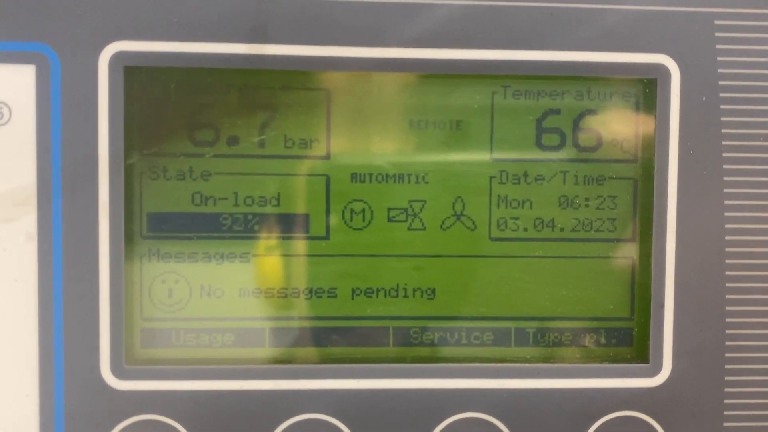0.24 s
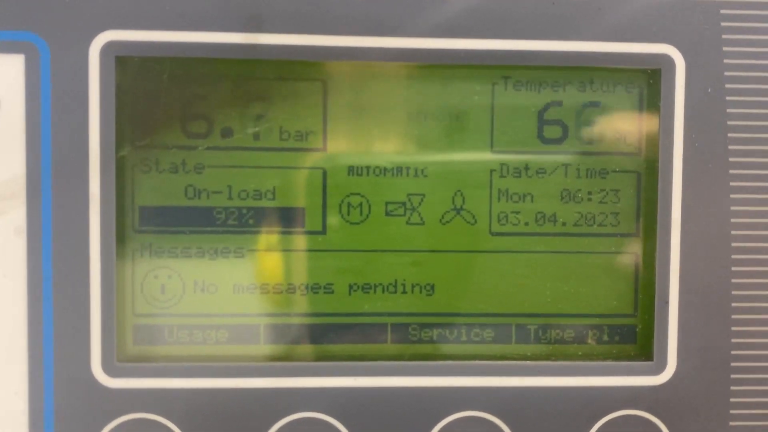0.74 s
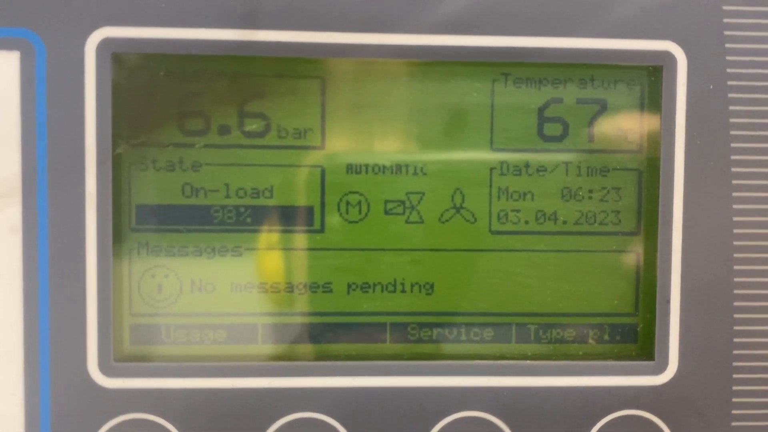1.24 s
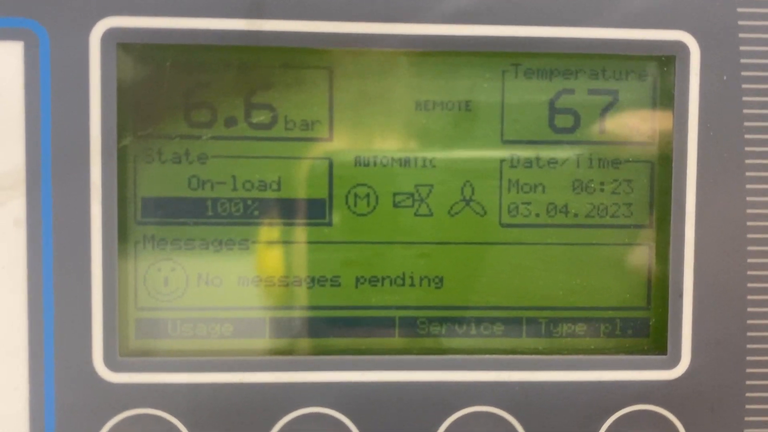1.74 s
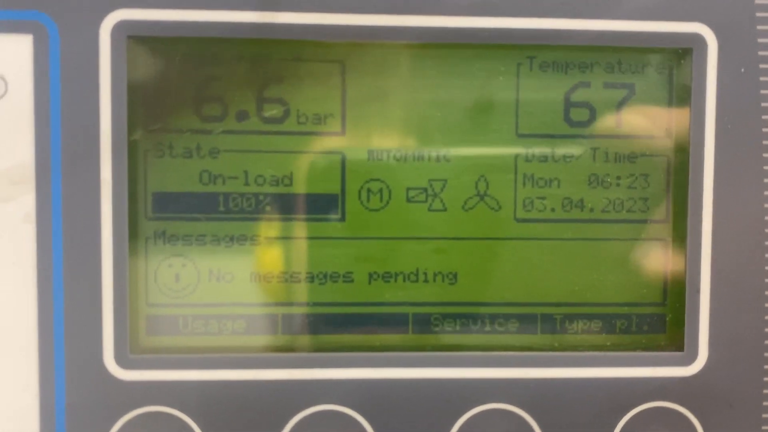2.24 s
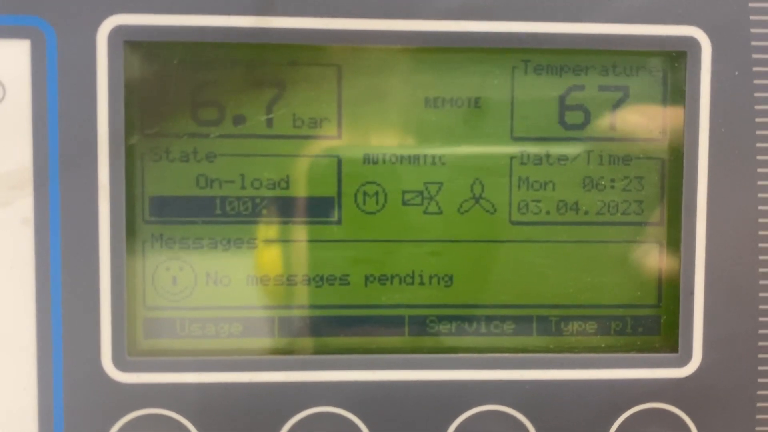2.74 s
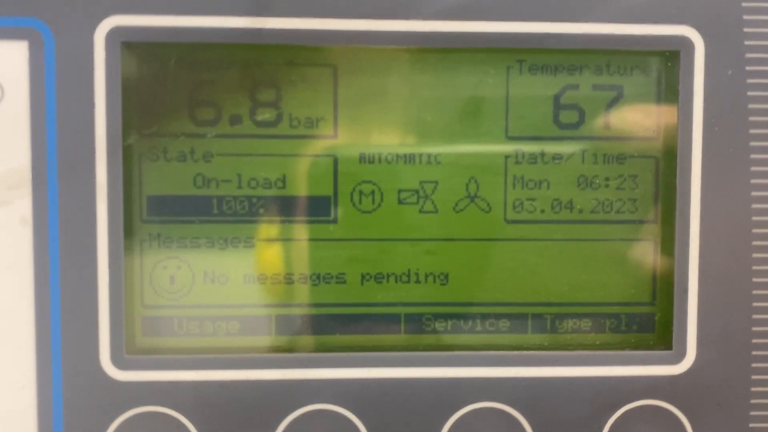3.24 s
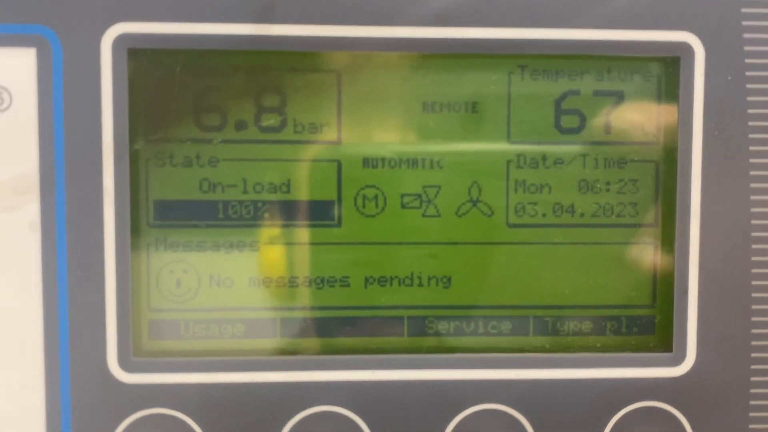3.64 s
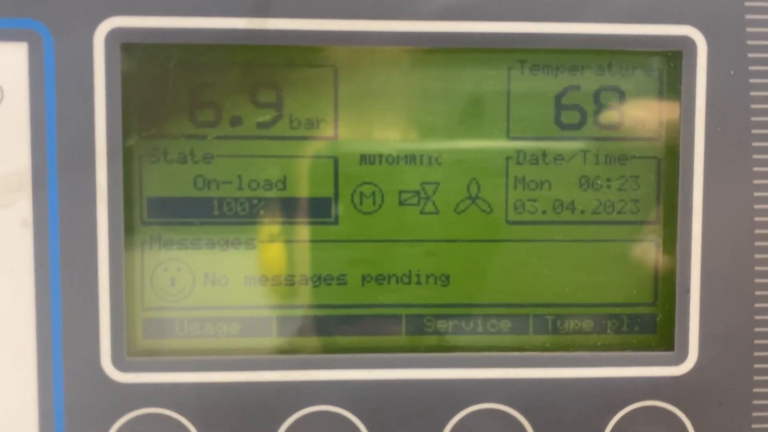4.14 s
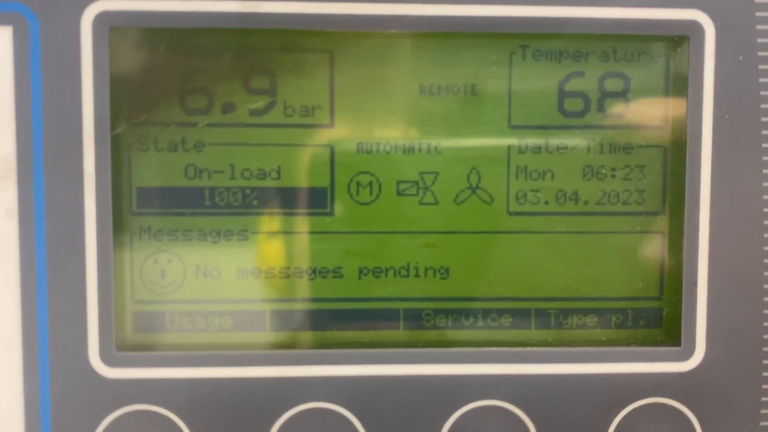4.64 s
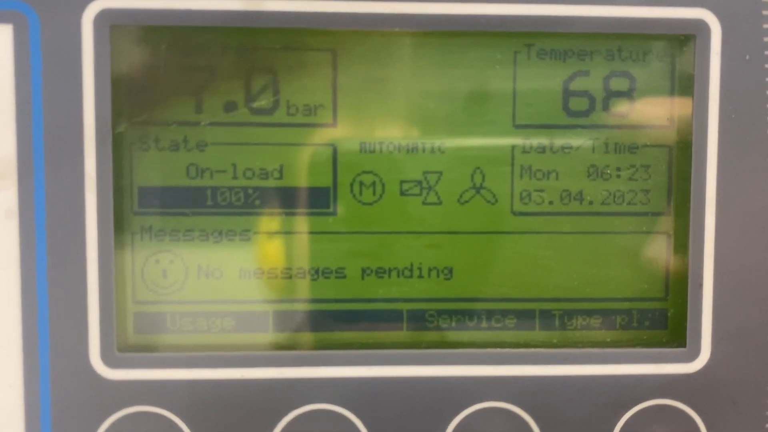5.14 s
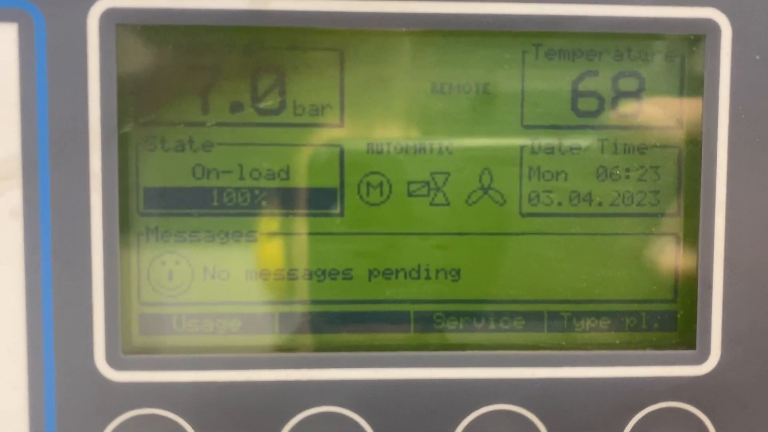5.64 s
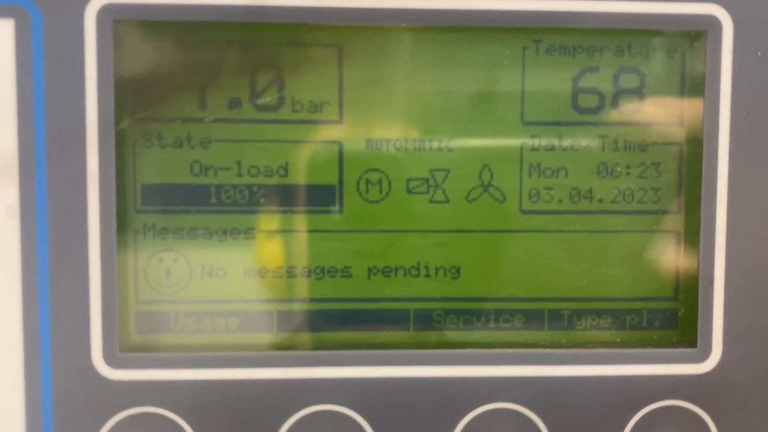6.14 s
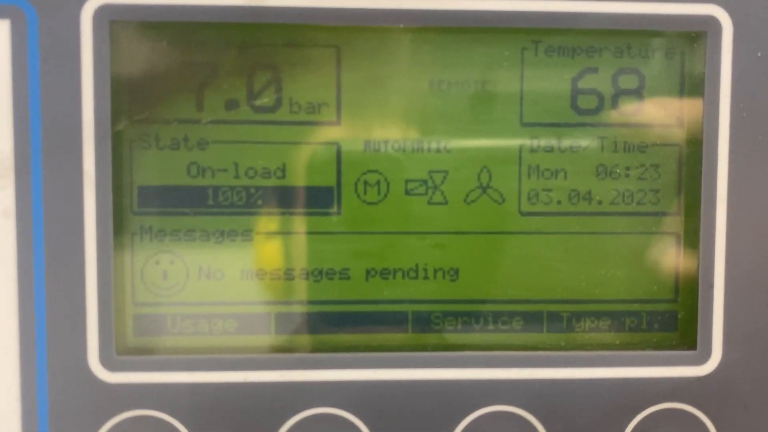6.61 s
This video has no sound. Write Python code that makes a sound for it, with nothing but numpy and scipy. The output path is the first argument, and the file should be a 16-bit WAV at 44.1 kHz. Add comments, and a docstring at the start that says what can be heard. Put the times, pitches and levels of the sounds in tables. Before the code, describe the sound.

A screw air compressor drones loudly up close, its whine climbing for two seconds then stepping down and settling under steady rushing air and deep hum.

```python
"""A variable-speed screw air compressor runs on load in a workshop, heard close to its cabinet.
At first the rotors speed up: their tones, made of sines, swell and fade in the standing waves of the room.
They then step down and settle, while a deep hum from a second drive, also sines, slows and picks up again.
Near the end a faint squeak, one gliding sine, rises. All along, fan blades and motors add steady sine tones,
and air rushes as shaped noise that rings in panels and ducts."""
import sys
import numpy as np
from scipy import signal
from scipy.fft import rfft, irfft, next_fast_len
from scipy.io import wavfile
from scipy.ndimage import uniform_filter1d

SR = 44100
rng = np.random.default_rng(int(sys.argv[2]) if len(sys.argv) > 2 else 0)


def log_audio(samples):
    """Write samples as a 16-bit WAV file to the path given in sys.argv[1]."""
    # one column per channel
    frames = np.atleast_2d(samples).T
    # limit to full scale, then quantise
    limited = np.clip(frames, -1, 1)
    pcm = np.round(limited * 32767).astype(np.int16)
    wavfile.write(sys.argv[1], SR, pcm)


N = 303143   # length in samples

# Air rush on the right: (frequency [Hz], level [dB per Hz])
AIR_RUSH = [(25, -79), (60, -51.5), (100, -49.5), (200, -51.5), (340, -56.5), (520, -60.5), (850, -65.5),
            (1400, -63.5), (2300, -73), (3500, -69), (5500, -65), (7700, -62), (8900, -76), (9450, -93)]
# Panels and ducts that ring in the rush: (centre [Hz], width [Hz], left level [dB per Hz], right level [dB per Hz])
PANEL_RESONANCES = [(305.4, 31, -51, -52), (1314, 180, -59, -57.5), (2157, 62, -70, -69.5),
                    (2636, 65, -60, -60), (2777, 89, -65, -58), (2904, 66, -57.5, -62.5),
                    (3096, 164, -57.5, -56.5), (3910, 108, -59.5, -61), (4780, 390, -66, -71),
                    (5056, 160, -55.5, -78.5), (5220, 110, -51.5, -59), (5830, 180, -61.5, -96),
                    (6276, 140, -54, -66), (6790, 445, -57.5, -58), (7270, 290, -62, -58.5)]
# Left compared with right: (frequency [Hz], left minus right [dB], likeness [0-1], left lead besides travel [rad])
LEFT_RIGHT = [(55, -9, .95, -1.3), (85, -12, .86, -2.3), (110, -14, .5, -4), (135, -11, .87, -4.9),
              (220, -4.5, .88, -5.8), (260, -2.5, .8, -6.2), (420, -6, .56, -5.6), (700, -1, .77, -6),
              (1050, -2.5, .6, -6.8), (1400, -4, .77, -7.1), (2300, -1.3, .45, -6), (4500, 2, .35, -6.5),
              (5500, 6, .4, -6.1), (6800, 0, .65, -5.4), (9000, -2, .4, -4.6)]
# The hiss eases as pressure builds: (time [s], change of level [dB])
TREBLE_EASING = [(0, 0.2), (1, -1), (3, -1.5), (5, -1.43), (6.87, -1.75)]
# Fan blade tone: (time [s], right level [dB])
BLADE_LEVEL = [(0, -31), (.8, -31.5), (1.2, -31.5), (1.7, -26.5), (2.6, -39), (3.5, -28.5), (4.7, -39),
               (5.9, -28.5), (6.5, -34.5), (6.87, -35)]
# Faint rising squeak: (time [s], frequency [Hz], level on both sides [dB])
SQUEAK_GLIDE = [(6.26, 1290, -57), (6.29, 1325, -41), (6.34, 1405, -38), (6.385, 1470, -40.5),
                (6.41, 1500, -53), (6.5, 1510, -59)]
# Deep hum of the second drive: (time [s], frequency [Hz], right level [dB])
DRIVE_HUM = [(0, 53.0, -25.3), (1.2, 53.1, -25), (2.0, 54.2, -23), (3.1, 55.6, -21), (3.35, 55.1, -22.4),
             (3.55, 52.6, -28.5), (4.15, 45, -36), (4.45, 41.8, -43), (5.68, 41.7, -45), (5.85, 45, -31),
             (6.08, 50.5, -26), (6.3, 51.6, -26), (6.87, 51.4, -27)]
# Tone at twice the hum frequency: (time [s], right level [dB])
DRIVE_HUM_OCTAVE = [(0, -42), (1.0, -39), (1.4, -48), (3.2, -35.5), (3.8, -31.5), (4.2, -25), (4.45, -36.5),
                    (5.8, -34.5), (6.4, -32.5), (6.87, -41)]
# Other overtones of the hum: (multiple of the hum frequency, level relative to the hum [dB])
DRIVE_HUM_OVERTONES = [(1.5, -21), (3, -13), (6, -16)]
# How often lobes pass, a ramp up and then steps down: (time [s], lobe rate [Hz])
LOBE_RATE = [(0, 290.0), (.28, 290.1), (2.28, 319.3), (2.88, 319.3), (2.98, 317.6), (3.56, 317.6),
             (3.66, 316.3), (4.77, 316.3), (4.8, 314.7), (6.87, 314.7)]
# Standing waves of the room at 1, 2, 3 and 4 times the lobe rate, four tables alike:
# (lobe rate [Hz], left level [dB], right level [dB], left lead [rad])
ROOM_FIRST = [(290.1, -16.7, -15.2, .4), (292, -14.2, -13, .4), (294, -14.5, -12.5, .3),
              (296.4, -15.7, -12, .3), (299.7, -30, -17.5, .4), (301.3, -26, -14.3, 1.6),
              (302.7, -22, -16.5, 1.7), (305, -22, -27, 1.2), (306.5, -17.3, -17.6, .6),
              (308, -19, -19, .6), (311, -32, -28.5, 1.0), (313.7, -28, -19.5, .6),
              (314.7, -24.1, -24.9, .5), (315.4, -22, -18, .6), (316.3, -30.5, -28.5, -.9),
              (317.6, -34.5, -27.4, -.5), (318.4, -42, -25.4, .1), (319.3, -35, -22.1, 1.2)]
ROOM_SECOND = [(290.1, -32.5, -33.0, 2.5), (292.0, -33.1, -33.8, 2.4), (294.0, -45.9, -44.6, 2.5),
               (299.0, -42.2, -42.8, 2.2), (302.5, -33.5, -33.5, 2.5), (305.5, -39.2, -40.5, 2.9),
               (308.5, -38.3, -42.9, 3.2), (310.5, -44.3, -33.5, 4.3), (313.0, -42.6, -44.3, 5.3),
               (314.7, -35.9, -35.5, 8.2), (315.5, -40.9, -41.0, 8.1), (316.3, -40.1, -40.7, 9.3),
               (317.0, -40.5, -38.1, 10.3), (317.6, -37.8, -39.4, 11.9), (318.4, -40.7, -37.5, 12.1),
               (319.3, -38.9, -33.6, 13.8)]
ROOM_THIRD = [(290.1, -48.7, -48.1, 2.2), (297.0, -52.2, -52.5, 2.2), (300.0, -43.5, -45.8, 2.1),
              (305.0, -53.7, -50.8, 2.3), (311.0, -46.9, -44.2, 2.7), (313.0, -51.5, -42.8, 2.9),
              (314.7, -48.7, -46.9, 2.6), (316.3, -47.6, -44.9, 1.2), (317.6, -43.0, -42.9, 2.1),
              (319.3, -48.2, -47.5, 2.6)]
ROOM_FOURTH = [(290.1, -47.6, -45.6, 1.7), (292.6, -46, -44, 2.5), (294, -33.5, -32.3, 2.5),
               (296.8, -26, -23, 2.3), (298.7, -34, -33, 2.4), (300.6, -32.6, -29.6, 2.6),
               (301.6, -38, -37, 2.2), (304, -28.6, -26, 2.3), (307.3, -29.8, -27.6, 2.7),
               (308.4, -37, -33, 2.6), (310, -37, -24, 4.0), (311.4, -31.6, -29.2, 3.3),
               (313.2, -40, -38, 3.2), (314.7, -38.3, -35.5, 2.4), (315.5, -48, -40, 1.8),
               (316.3, -42, -29.3, 3.9), (317.6, -43, -33.5, 2.1), (318.4, -52, -37, .1),
               (319.3, -41, -35, -.7)]
# Every other lobe is stronger, so tones at 1/2 and 3/2 of the lobe rate throb together, two tables alike:
# (time [s], right level at the crest [dB], throb depth [0-1])
HALF_ORDER = [(0, -38, 0.1), (1.25, -26, 0), (1.55, -30, .3), (2.3, -26.5, 1), (3.3, -27, .9),
              (4.2, -27, 1), (6.87, -25.5, 1)]
THREE_HALVES_ORDER = [(0, -54, .3), (1.1, -48.5, 0.39), (1.5, -37.5, 0.55), (2.7, -44, 0.5),
                      (3.3, -38.5, 0.99), (6.87, -35.5, .8)]
# Tone at 5/4 of the lobe rate: (lobe rate [Hz], right level [dB])
FIVE_QUARTERS_ORDER = [(290, -46), (296, -33), (301, -30), (307, -35), (313, -37), (315, -41), (317, -50)]

TRAVEL_S = .00043   # sound reaches the left side this much earlier
CABINET_T60_S, CABINET_DB = .3, -10   # echoes between cabinet and walls: time to fall 60 dB, level beside direct
BLADES_HZ, BLADES_OCTAVE_DB = 187.5, -11   # the octave is relative to the blade tone
MAINS_HZ, MAINS_DB = 100, -41   # magnetic buzz of the motors
FIFTH_DB = -48   # tone at 5 times the lobe rate, right level
THROB_S, THROB_CREST_S = .865, 6.75   # period and time of the last crest
ROOM_SETTLES_S = .06   # a change of pitch is smoothed over this long in the standing waves
CUTOFF_HZ = 9480


def from_db(db):
    """Turn decibels into a gain."""
    return 10 ** (np.asarray(db) / 20)


def in_time(rows):
    """Read a table's columns along time, one value per sample."""
    s, *columns = np.transpose(rows)
    return [np.interp(np.arange(N) / SR, s, column) for column in columns]


def at_hz(rows, hz):
    """Read a table's columns at given frequencies, on a logarithmic scale as pitch is heard."""
    points, *columns = np.transpose(rows)
    return [np.interp(np.log(hz), np.log(points), column) for column in columns]


def drift(rate):
    """Wander at random with a spread of about 1, through 2 * rate random values a second."""
    steps = rng.standard_normal(400)
    position = np.arange(N) / SR * 2 * rate % 399
    return 1.22 * np.interp(position, np.arange(400), steps)   # joining by lines shrinks the spread; undo that


def tone(hz, left_db, right_db, lead, waver_db):
    """Make a sine on both sides whose level wavers a little; lead [rad] puts the left ahead."""
    turn = 2 * np.pi * (np.cumsum(hz) / SR + rng.random())
    waver = waver_db * (drift(7) + 0.92 * drift(18))
    height = np.sqrt(2) * from_db(waver)   # levels in dB are RMS, so the peak is higher
    left = from_db(left_db) * np.sin(turn + lead)
    right = from_db(right_db) * np.sin(turn)
    return height * np.array([left, right])


def port_tone(hz, right_db, waver_db):
    """Make a sine that takes its left-right balance and lead from the frequency."""
    balance_db, _, lead = at_hz(LEFT_RIGHT, hz)
    travel_lead = 2 * np.pi * hz * TRAVEL_S
    return tone(hz, right_db + balance_db, right_db, lead + travel_lead, waver_db)


def echoes(size):
    """Spectrum of direct sound plus a dying random tail, unlike on each side: it ripples finely."""
    t = np.arange(SR // 2) / SR
    tail = rng.standard_normal((2, len(t))) * from_db(-60 * t / CABINET_T60_S)
    tail *= from_db(CABINET_DB) / np.sqrt(np.sum(tail ** 2, axis=1, keepdims=True))
    return (1 + rfft(tail, size)) / np.sqrt(1 + from_db(2 * CABINET_DB))   # keep the total power


def air(gust_db, panel_db):
    """Partly shared noise on the two sides, coloured by rush, panel resonances and echoes."""
    size = next_fast_len(N)
    hz = np.maximum(np.arange(size // 2 + 1) * SR / size, 1)
    balance_db, alike, lead = at_hz(LEFT_RIGHT, hz)
    alike = np.clip(alike, 0, 1)
    rush_db, = at_hz(AIR_RUSH, hz)

    # Doubling the dB before from_db gives power instead of gain
    power = from_db(2 * np.array([rush_db + balance_db, rush_db]))
    for centre, width, left_db, right_db in PANEL_RESONANCES:
        peak = from_db([[2 * left_db], [2 * right_db]])
        power += peak / (1 + (2 * (hz - centre) / width) ** 2) ** 2

    right, own = rfft(rng.standard_normal((2, size)))
    left = alike * right + np.sqrt(1 - alike ** 2) * own
    left = left * np.exp(1j * (lead + 2 * np.pi * hz * TRAVEL_S))
    rush = np.sqrt(power * SR / 2) * echoes(size) * [left, right]

    # Each frequency range flickers on its own, the thin panels most
    edges_hz = [0, 400, 1000, 2000, 2500, 2700, 2830, 2980, 3300, 4200, 5000, 5600, 6500, 7600, SR]
    easing_db, = in_time(TREBLE_EASING)
    out = 0
    for low, high in zip(edges_hz, edges_hz[1:]):
        flicker_db = panel_db if 2000 <= low < 3300 else gust_db
        level_db = flicker_db * drift(7)
        if low >= 2500:
            level_db = level_db + easing_db
        in_range = (hz >= low) & (hz < high)
        out = out + from_db(level_db) * irfft(rush * in_range, size)[:, :N]
    return out


def fan():
    """Passing blades push the air at a steady rate: a tone and its octave."""
    hz = np.full(N, BLADES_HZ)
    level_db, = in_time(BLADE_LEVEL)
    blade_tone = port_tone(hz, level_db, waver_db=1.5)
    octave = port_tone(2 * hz, level_db + BLADES_OCTAVE_DB, waver_db=1.4)
    return blade_tone + octave


def squeak():
    """One short sine glides upward, silent outside its rows."""
    hz, level_db = in_time(SQUEAK_GLIDE)
    t = np.arange(N) / SR
    sounding = (t > SQUEAK_GLIDE[0][0]) & (t < SQUEAK_GLIDE[-1][0])
    return sounding * tone(hz, level_db, level_db, 0, waver_db=.6)


def hum():
    """The second drive hums with overtones that follow its speed; the mains buzz keeps its pitch."""
    hz, level_db = in_time(DRIVE_HUM)
    octave_db, = in_time(DRIVE_HUM_OCTAVE)
    out = port_tone(hz, level_db, waver_db=.25)
    for order, relative_db in DRIVE_HUM_OVERTONES:
        out += port_tone(order * hz, level_db + relative_db, waver_db=1.5)
    out += port_tone(np.full(N, MAINS_HZ), MAINS_DB, waver_db=1.5)
    out += port_tone(2 * hz, octave_db, waver_db=2.5)
    return out


def throbbing(rows):
    """Level in dB of a tone that swells and sinks once a period."""
    crest_db, depth = in_time(rows)
    depth = np.clip(depth, 0, .97)   # never sinks to full silence
    swing = np.cos(2 * np.pi * (np.arange(N) / SR - THROB_CREST_S) / THROB_S)
    return crest_db + 20 * np.log10((1 + depth * swing) / (1 + depth))


def in_room(rows, hz):
    """Standing waves set left level, right level and lead for the lobe rate, smoothed over time."""
    return uniform_filter1d(at_hz(rows, hz), int(ROOM_SETTLES_S * SR))


def rotors():
    """Meshing lobes send out pressure pulses: tones at whole, half and quarter multiples of their rate."""
    hz, = in_time(LOBE_RATE)
    out = tone(hz, *in_room(ROOM_FIRST, hz), waver_db=.4)   # the strong first tone is the steadiest
    for order, rows in [(2, ROOM_SECOND), (3, ROOM_THIRD), (4, ROOM_FOURTH)]:
        out += tone(order * hz, *in_room(rows, hz), waver_db=1.0)

    out += port_tone(hz / 2, throbbing(HALF_ORDER), waver_db=.7)
    five_quarters_db, = at_hz(FIVE_QUARTERS_ORDER, hz)
    out += port_tone(5 / 4 * hz, five_quarters_db, waver_db=1.4)
    out += port_tone(3 / 2 * hz, throbbing(THREE_HALVES_ORDER), waver_db=1.4)
    out += port_tone(5 * hz, FIFTH_DB, waver_db=1.4)
    return out


def scene():
    """Add all sources together, left and right."""
    return air(gust_db=0.77, panel_db=1.5) + fan() + squeak() + hum() + rotors()


def record(dry):
    """Cut the top steeply: at most 0.3 dB of ripple below the cutoff, 90 dB down above it."""
    top_cut = signal.ellip(14, .3, 90, CUTOFF_HZ, fs=SR, output="sos")
    return signal.sosfilt(top_cut, dry)


dry = scene()
out = record(dry)
log_audio(out)
```